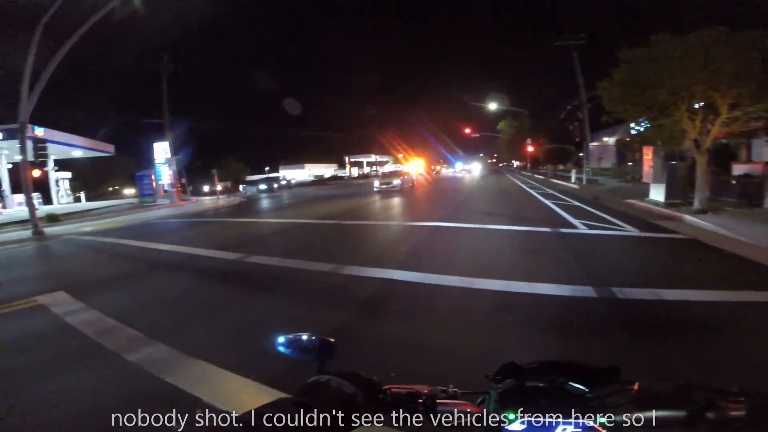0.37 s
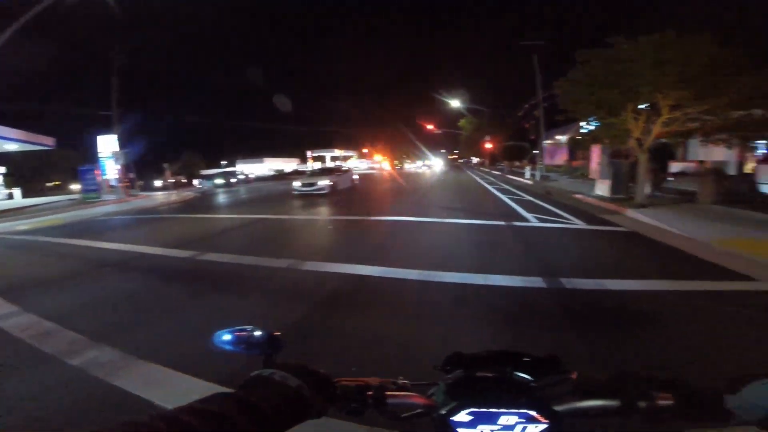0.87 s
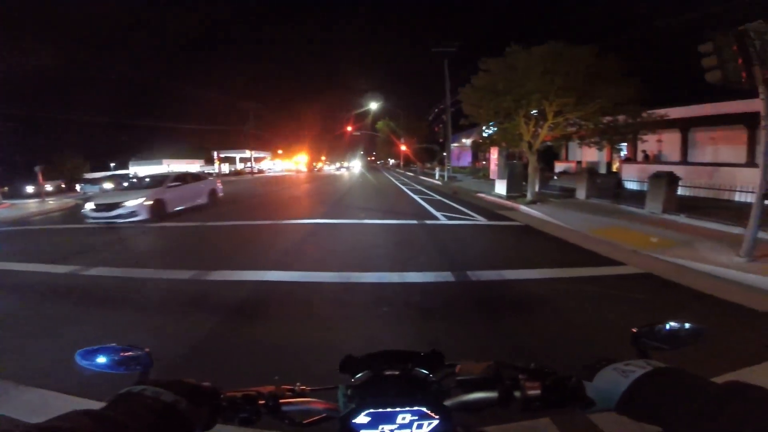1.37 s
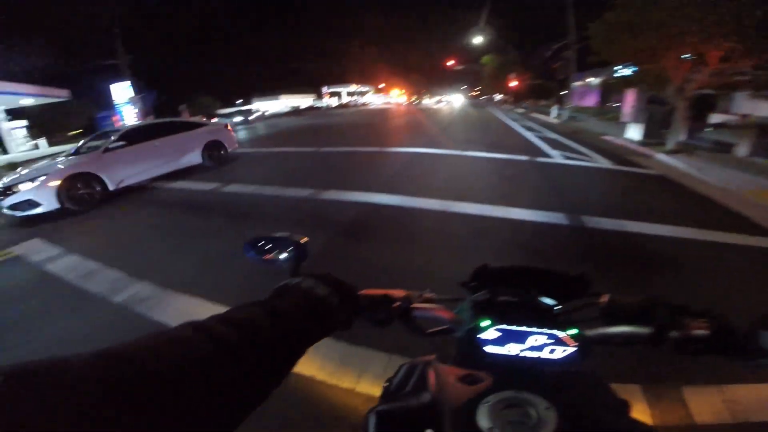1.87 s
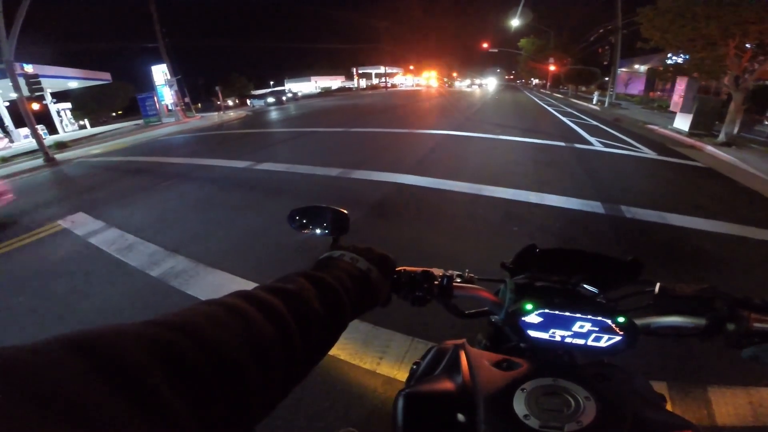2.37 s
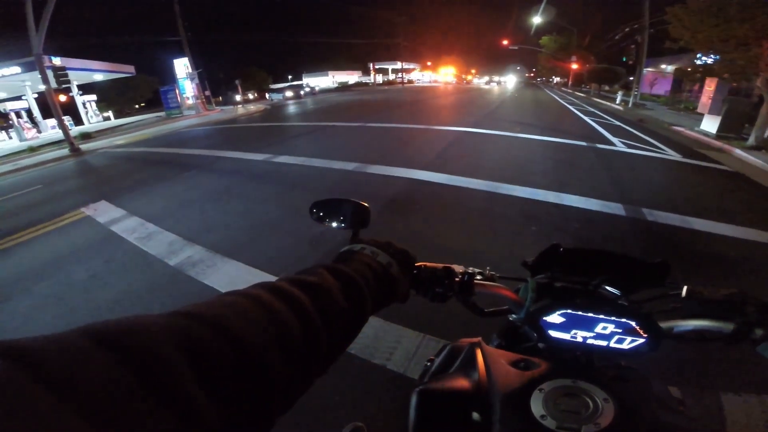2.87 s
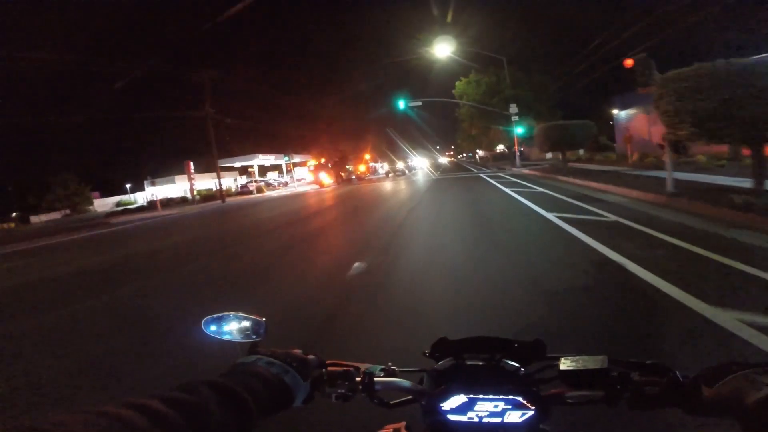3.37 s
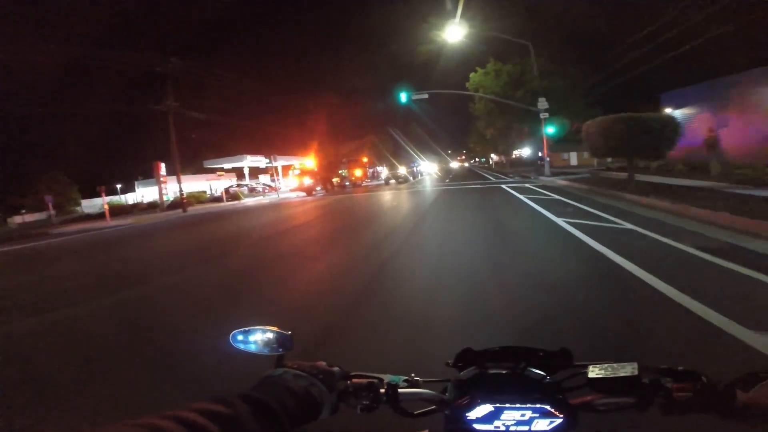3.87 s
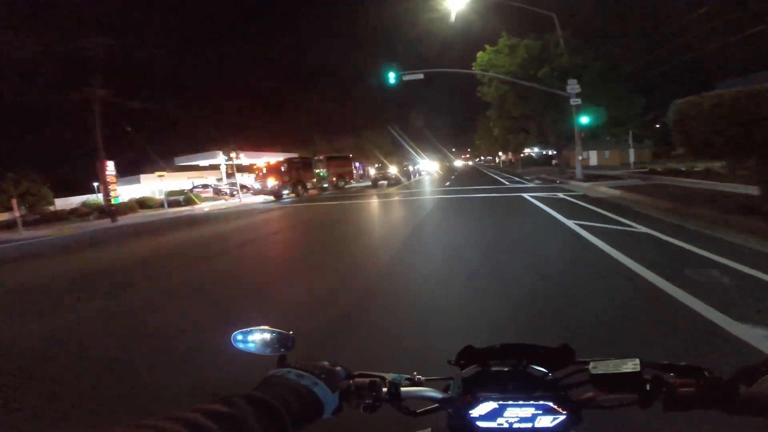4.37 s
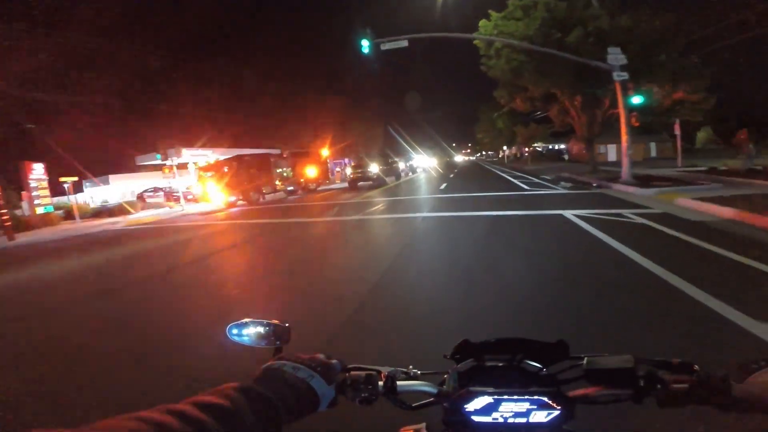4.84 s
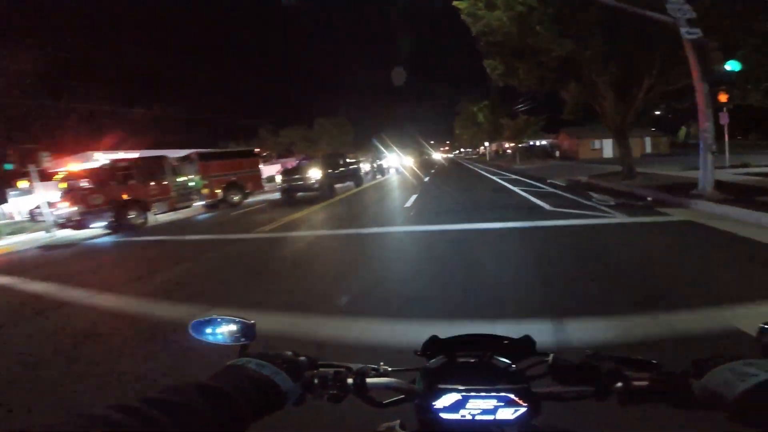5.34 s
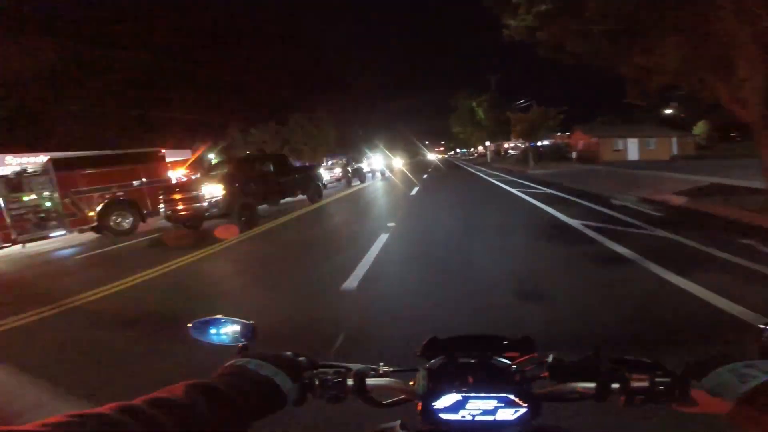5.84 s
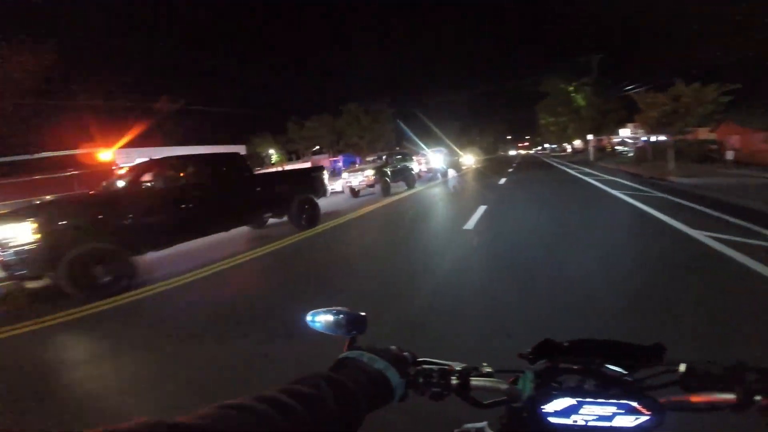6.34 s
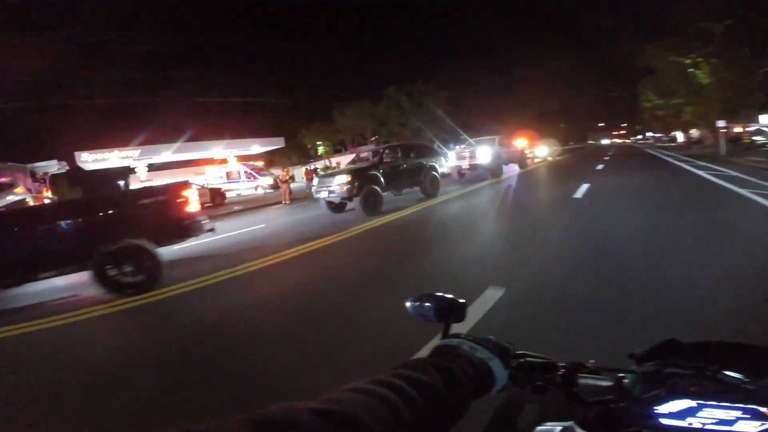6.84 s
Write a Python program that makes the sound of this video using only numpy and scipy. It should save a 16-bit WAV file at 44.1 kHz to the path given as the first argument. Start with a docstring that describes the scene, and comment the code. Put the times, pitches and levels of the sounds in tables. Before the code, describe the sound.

One microphone close to the rider, nearly everything on the right, the left only faint buzz and hiss. First a lumpy motorcycle idle with low electrical hum, crisp clicks, tiny ticks, rustling and a car rolling past. A momentary fade to nothing, then the engine pulls steadily, louder and rising slightly in pitch, with low wind gusts, mechanical rattle and a rough roar.

```python
"""Night street from a motorcycle saddle, one microphone wired to the right channel. An uneven-firing twin (sine
orders plus gated noise) idles under a strong low hum while a car rolls by (noise swelling as 1/distance), very
high ticks sound and gear clicks. After a short fade the bike is under way: wind noise, road roar, rattle and a low
drone of sines under the exhaust. The left channel holds only crosstalk, buzz and amplifier hiss."""
import sys
import numpy as np
from scipy import signal
from scipy.fft import rfft, irfft
from scipy.io import wavfile
from scipy.ndimage import uniform_filter1d

SR = 44100
rng = np.random.default_rng(int(sys.argv[2]) if len(sys.argv) > 2 else 0)


def pcm_store(signal):
    """Save signal as 16-bit PCM."""
    levels = np.round(np.clip(np.atleast_2d(signal), -1, 1) * 32767)
    wavfile.write(sys.argv[1], SR, levels.astype(np.int16).T)


def invert_db(level):
    """Linear amplitude ratio for a level in decibels (20 dB per decade), elementwise."""
    return 10 ** (np.asarray(level, dtype=float) / 20)


N = 307443

# engine speed while riding: t/s, cycles per second/Hz
RIDE_SPEED = [(3.42, 26.05), (3.78, 26.42), (4.0, 26.75), (4.38, 27.12), (4.78, 27.5), (5.1, 27.58),
              (5.4, 27.7), (5.8, 27.78), (6.4, 27.78), (6.6, 27.83), (6.97, 27.83)]
# spectrum of car and road roar: f/Hz, density/dB per Hz
ROAR_COLOUR = [(250, -18.5), (450, 3), (700, 4), (950, 1), (1200, -9.5), (2000, -31)]
# fade between the two moments: out from, silent at, back by [s]
FADE_S = (3.352, 3.387, 3.427)


def curve(table):
    """Second column of a (t/s, value) table, joined by straight lines."""
    s, value = np.transpose(table)
    return np.interp(np.arange(N) / SR, s, value)


def shape(x, points, skirt_db=-20):
    """Causal minimum-phase filter through (f/Hz, gain/dB) points, made from the folded cepstrum."""
    size = 2 ** 15
    hz, db = np.transpose(points)
    log_bins = np.log(np.arange(size // 2 + 1) * SR / size + 1)
    gain_db = np.interp(log_bins, np.log(hz), db, db[0] + skirt_db, db[-1] + skirt_db)
    cepstrum = irfft(gain_db * np.log(10) / 20)
    cepstrum[1:size // 2] *= 2
    cepstrum[size // 2 + 1:] = 0
    impulse = irfft(np.exp(rfft(cepstrum)))[:size // 2]
    return signal.fftconvolve(x, impulse)[:N]


def noise(points):
    """Coloured noise, rms 1."""
    y = shape(rng.standard_normal(N), points)
    return y / y.std()


def walk(rate_hz):
    """Random levels held 1 / rate_hz and slewed twice; spread near 1."""
    k = int(SR / rate_hz)
    held = np.repeat(rng.standard_normal(N // k + 1), k)
    return 1.2 * uniform_filter1d(uniform_filter1d(held, k), k)[:N]


def swells(table, bed_db):
    """Gain of bell-shaped swells over a constant bed, added as powers."""
    t = np.arange(N) / SR
    power = invert_db(bed_db) ** 2
    for s, db, half_s in table:
        power = power + (invert_db(db) * np.exp(-((t - s) / half_s) ** 2)) ** 2
    return np.sqrt(power)


def twin(speed, note_db, gas_db, orders, gas, start, smear, scatter_db, depth, puff_s):
    """Exhaust note on the orders of the engine cycle; each of the two firings also lets out a puff of noise."""
    # narrow pipe resonances lift the orders that climb into them: f/Hz, width/Hz, lift/dB
    pipe = [(129, 4, 4), (284, 20, 4), (444, 12, 6), (526, 14, 14)]
    second_firing = 3 / 8  # share of the cycle: firings 270 then 450 crank degrees apart
    second_puff_db, firing_share, waver_db = -2, 0.6, 1.1  # share: how far the note follows firing size
    hz = curve(speed)
    cycles = start + np.cumsum(hz) / SR
    note = 0
    for multiple, db in orders:
        # orders line up at the two firings; the pipe delays the higher ones and so smears each blow
        lag = np.angle(0.7 + np.exp(2j * np.pi * multiple * second_firing)) + smear * multiple ** 2
        lift_db = sum(top_db * np.exp(-((multiple * hz - at_hz) / width_hz) ** 2)
                      for at_hz, width_hz, top_db in pipe)
        level = invert_db(db + lift_db + waver_db * walk(6))
        note = note - level * np.sqrt(2) * np.cos(2 * np.pi * multiple * cycles - lag)

    due = (np.arange(int(cycles[-1]))[:, None] + np.array([0, second_firing])).ravel()
    later = np.arange(len(due)) % 2
    size = invert_db(scatter_db * rng.standard_normal(len(due)) + second_puff_db * later)
    pulses = np.bincount(np.interp(due, cycles, np.arange(N)).astype(int), size, N)
    decay = np.exp(-1 / (puff_s * SR))
    puffs = signal.lfilter([1], [1, -decay], uniform_filter1d(pulses, size=60))
    gate = 1 - depth + depth * puffs / np.sqrt(np.mean(puffs ** 2))

    strength = np.interp(cycles, due, size) ** firing_share
    note = invert_db(note_db) * note * strength / np.sqrt(np.mean(strength ** 2))
    return note + invert_db(gas_db + waver_db * walk(14)) * gate * noise(gas)


def idling():
    """The twin ticking over near 11 cycles a second, firings uneven in size."""
    # engine speed: t/s, cycles per second/Hz
    speed = [(0, 11.23), (.5, 11.28), (1.15, 10.96), (1.45, 11.25), (2.16, 10.72), (2.8, 11.2),
             (3.36, 11.02)]
    # strength of the firings: t/s, level/dB
    note_db = [(0, -1), (.5, -0.5), (1.2, -2.5), (1.6, -1.5), (1.9, -0.5), (2.5, 0.5), (3.36, -1)]
    # exhaust note; the firing intervals favour orders 3, 5, 6, 8, 11: multiple of the cycle, level/dB
    orders = [(2, -53), (3, -44), (4, -53), (5, -41), (6, -47), (7, -53), (8, -41), (9, -51), (10, -49),
              (11, -42), (12, -53), (13, -48), (14, -50), (15, -56), (16, -49), (17, -58), (18, -56),
              (19, -52), (20, -58), (21, -51), (22, -53), (23, -59), (24, -60), (27, -56), (29, -62)]
    # gas noise: f/Hz, density/dB per Hz
    gas = [(25, -26), (45, -9), (85, -6), (130, -3.5), (200, -7), (300, -6.5), (420, -13.5), (900, -27),
           (1500, -25.5), (2500, -27), (4500, -36), (7000, -40.5), (10000, -46), (12500, -51.5),
           (15300, -62)]
    # start: share of the cycle; smear: radians per order squared
    return twin(speed, curve(note_db), -36, orders, gas,
                start=0.79, smear=0.013, scatter_db=1.5, depth=0.15, puff_s=0.008)


def hum(multiple=1):
    """Steady low sine, rms 1."""
    hum_hz = 60.05
    return np.sqrt(2) * np.sin(2 * np.pi * multiple * hum_hz * np.arange(N) / SR)


def strong_hum():
    """The hum at its slowly changing level, with a faint tone not quite an octave above."""
    # t/s, level/dB
    level_db = [(0, -18), (1.7, -19), (2, -21.5), (3.4, -22), (3.6, -26), (4.4, -22), (5.4, -21.5),
                (6, -25), (6.4, -29), (6.97, -32)]
    return invert_db(curve(level_db)) * (hum() + invert_db(-29) * hum(multiple=1.9))


def whine(after):
    """Thin whine: resonators narrow white noise to bands, each wavering in level."""
    # f/Hz, width/Hz, level waiting/dB, level riding/dB
    bands = [(5034, 110, -66, -63), (10060, 110, -77, -71)]
    out = 0
    for hz, width_hz, waiting_db, riding_db in bands:
        band = signal.lfilter(*signal.iirpeak(hz, hz / width_hz, SR), rng.standard_normal(N))
        db = np.where(after, riding_db, waiting_db)
        out = out + invert_db(db + 2.1 * walk(3.9)) * band / band.std()
    return out


def dead_channel(live):
    """Unwired channel: dull low-passed crosstalk, buzz on overtones of the hum, amplifier hiss."""
    # f/Hz, density/dB per Hz
    hiss = [(20, -92), (60, -88), (150, -88), (300, -95), (1000, -101), (3000, -104), (8000, -108),
            (15000, -110), (15300, -140)]
    # multiple of the hum, level/dB
    buzz = [(2, -72), (3, -73), (4, -77), (5, -83)]
    crosstalk_db, crosstalk_hz, hiss_db = -32.8, 140, -62.5
    leak = invert_db(crosstalk_db) * signal.filtfilt(*signal.butter(1, crosstalk_hz, fs=SR), live)
    tones = sum(invert_db(db) * hum(multiple) for multiple, db in buzz)
    return leak + invert_db(hiss_db) * noise(hiss) + tones


def traffic():
    """A car crosses over distant traffic: roar, tyre hiss and a singing band rise and fall as 1/distance."""
    # tyre hiss: f/Hz, density/dB per Hz
    tyre_colour = [(700, -18.5), (1250, 2), (1800, 1), (2500, -6), (3100, -11), (3500, -22), (4200, -16),
                   (8000, -25), (14000, -46)]
    # singing band of the car: f/Hz, density/dB per Hz
    whine_colour = [(3050, -30), (3330, -2), (3500, 0), (3700, -4), (4000, -30)]
    nearest_s, speed_m_s, nearest_m = 1.72, 9, 3.8
    roar_late_s = 0.38  # the exhaust is loudest once the tail has passed
    car_roar_db, car_tyres_db, far_roar_db, far_tyres_db = -41, -45, -48, -54
    whine_s, whine_db = 1.5, -61

    def near(s):
        """Gain of a source passing at time s, 1 at its nearest."""
        return nearest_m / np.hypot(nearest_m, speed_m_s * (np.arange(N) / SR - s))

    roar = np.hypot(invert_db(far_roar_db), invert_db(car_roar_db) * near(nearest_s + roar_late_s))
    tyres = np.hypot(invert_db(far_tyres_db), invert_db(car_tyres_db) * near(nearest_s))
    out = roar * invert_db(1.0 * walk(18)) * noise(ROAR_COLOUR)
    out = out + tyres * invert_db(1.5 * walk(6.63)) * noise(tyre_colour)
    return out + invert_db(whine_db + 1.7 * walk(9.7)) * near(whine_s) * noise(whine_colour)


def rustle():
    """Soft treble rustles: flickering noise swelling over a faint bed."""
    # peak t/s, peak level/dB, half length/s
    rustles = [(.05, -51, 0.14), (.3, -51, 0.26), (.94, -60, .15), (1.74, -54, 0.21), (2.45, -50, 0.19),
               (3.07, -70, .04)]
    # f/Hz, density/dB per Hz
    colour = [(2000, -2), (4500, -9), (7000, -11.5), (10000, -14.5), (12500, -20), (15000, -43)]
    return swells(rustles, bed_db=-80) * invert_db(2.4 * walk(24.4)) * noise(colour)


def ticks():
    """Each very high tick is a short stutter of three decaying sines."""
    # t/s, level/dB
    tick_table = [(0.0737, -37), (0.3247, -41), (0.4579, -38), (0.5746, -39), (0.7248, -39), (0.8455, -40),
                  (1.0091, -45), (1.2984, -44), (1.4391, -48), (1.5748, -44), (1.7075, -41), (1.8262, -37),
                  (2.1061, -39), (2.2553, -52), (2.372, -41), (2.7252, -42), (2.9422, -48)]
    out, t = np.zeros(N), np.arange(int(0.004 * SR)) / SR
    for (s, db), stutter in zip(tick_table, rng.random((len(tick_table), 3, 3))):
        for k, (late, size, pitch) in enumerate(stutter):
            follows = k > 0  # the first is on time and loudest
            i = int((s + follows * late * 0.009) * SR)
            swing = np.sin(2 * np.pi * (12500 + 2600 * pitch) * t) * np.exp(-t / 0.0004)
            out[i:i + len(t)] += invert_db(db - 5 * follows * size) * swing
    return out


def clicks():
    """Hard gear clicks close by: a sharp knock in a band-passed noise burst that dies within milliseconds."""
    # t/s, peak level/dB, centre f/Hz, length/ms
    click_table = [(.165, -34, 6500, .2), (.303, -32, 4470, .4), (.921, -42, 9000, .15),
                   (.9336, -25.5, 5600, .12), (.961, -40, 6500, .6), (.966, -41, 6500, .5),
                   (1.751, -36, 7500, .25), (1.946, -39, 9000, .25), (1.994, -35, 5500, .25),
                   (2.064, -36, 9000, .2), (2.111, -37, 6000, .2), (2.2565, -41, 10000, .2),
                   (2.2651, -25.5, 7500, .2), (2.667, -31, 5000, .2), (3.0608, -40, 7000, .15),
                   (3.0652, -28, 7500, .15), (3.0826, -33, 7500, .12), (3.2506, -23.5, 6700, .45),
                   (3.2522, -33, 5800, 1.4)]
    out, t_ms = np.zeros(N), np.arange(int(0.012 * SR)) / SR * 1000
    for s, db, hz, ms in click_table:
        burst = rng.standard_normal(len(t_ms))
        burst[int(ms * SR / 1000)] += 4  # the knock
        burst *= t_ms * np.exp(-t_ms / ms) + 0.04 * ms * np.exp(-t_ms / 4)
        band = signal.butter(3, [0.5 * hz, 1.45 * hz], "band", fs=SR)
        burst = signal.lfilter(*band, burst)
        i = int(s * SR)
        out[i:i + len(t_ms)] += invert_db(db) * burst / abs(burst).max()
    return out


def waiting():
    """First moment: idle, traffic, rustle, ticks and clicks."""
    return idling() + traffic() + rustle() + ticks() + clicks()


def under_load():
    """The twin pulling, 26 to 28 cycles a second, with louder gas noise."""
    # exhaust note: multiple of the cycle, level/dB
    orders = [(1, -42), (2, -46), (3, -33), (4, -37), (5, -31), (6, -34.5), (7, -50), (8, -41), (9, -41),
              (10, -39.5), (11, -40), (12, -45), (13, -47), (14, -53), (15, -52), (16, -49), (17, -46.5),
              (18, -51), (19, -57), (20, -61), (21, -55), (22, -54), (23, -50), (24, -53), (26, -55),
              (28, -51.5), (30, -52), (34, -53), (36, -59), (46, -60), (55, -63)]
    # gas noise: f/Hz, density/dB per Hz
    gas = [(40, -18), (100, -6), (250, -3), (400, -9), (600, -9.5), (800, -15), (1200, -16.5), (2500, -22),
           (4500, -30), (6500, -33.5), (9500, -40.5), (11500, -45.5), (12800, -58), (13600, -67)]
    return twin(RIDE_SPEED, 1.8, -29, orders, gas,
                start=0.72, smear=0.04, scatter_db=2, depth=0.16, puff_s=0.005)


def wind():
    """Air on the microphone: fluttering low noise with gusts, plus a steady breeze."""
    # peak t/s, peak level/dB, half length/s
    gusts = [(3.44, -26.5, .04), (3.9, -28, 0.1), (4.43, -26, .06), (5.3, -20, 0.053), (5.55, -22.5, 0.13),
             (5.85, -32, 0.053), (6.05, -18.5, 0.053), (6.22, -32, .06), (6.92, -31, .08)]
    # gusts and their bed: f/Hz, density/dB per Hz
    gust_colour = [(7, -30), (11, -1), (16, 0), (25, -6), (40, -7), (70, -12), (150, -20), (400, -36),
                   (2000, -70), (8000, -110)]
    # steady stream of air: f/Hz, density/dB per Hz
    breeze_colour = [(10, -19), (20, -5), (32, -2.5), (50, -3.5), (100, -9), (300, -27.5), (2000, -67)]
    gusting = swells(gusts, bed_db=-54) * invert_db(2 * walk(10)) * noise(gust_colour)
    return gusting + invert_db(-28.5 + 0.59 * walk(13)) * noise(breeze_colour)


def thump():
    """A buffet of air knocks the microphone: a couple of low swings."""
    peak_s, level_db, hz, half_s = 3.434, -14, 68, 0.014
    t = np.arange(N) / SR - peak_s
    return -invert_db(level_db) * np.exp(-(t / half_s) ** 2) * np.cos(2 * np.pi * hz * t)


def rattle():
    """Loose parts and valve gear: filtered random impulses of unequal size and either sign."""
    # f/Hz, density/dB per Hz
    colour = [(400, -33), (700, 2.5), (1200, -1), (1800, -1), (2500, -10.5), (5000, -22), (9000, -25.5)]
    knocks_per_s, spread_db, level_db = 300, 18, -43
    where, way, size = rng.random((3, N))
    knocks = (where < knocks_per_s / SR) * np.sign(way - 0.5) * invert_db(spread_db * size)
    y = shape(knocks, colour)
    return invert_db(level_db + 0.98 * walk(12)) * y / y.std()


def road_roar():
    """Intake and road roar: noise that swells once an engine cycle."""
    # t/s, level/dB
    level_db = [(3.4, -60), (4, -52), (4.4, -45), (4.7, -38.5), (5.0, -39.5), (5.3, -37.5), (5.7, -39),
                (5.9, -47), (6.1, -38), (6.5, -38), (6.97, -36)]
    throb_db = 3.5 * np.cos(2 * np.pi * np.cumsum(curve(RIDE_SPEED)) / SR)
    return invert_db(curve(level_db) + throb_db + 0.82 * walk(11)) * noise(ROAR_COLOUR)


def drone():
    """Low drone just under the third order, three harmonics, rising with engine speed."""
    # t/s, level/dB
    level_db = [(3.4, -27.5), (3.9, -28), (4.5, -30.5), (5.1, -27.5), (6.4, -28), (6.97, -22)]
    order, second_db, third_db = 2.915, -12.5, -15.5
    turn = 2 * np.pi * order * np.cumsum(curve(RIDE_SPEED)) / SR
    tone = np.sin(turn) + invert_db(second_db) * np.sin(2 * turn) + invert_db(third_db) * np.sin(3 * turn)
    return invert_db(curve(level_db) + 1.2 * walk(8.1)) * np.sqrt(2) * tone


def riding():
    """Second moment: twin under load, wind, rattle, roar and drone, low-passed so the top treble is gone."""
    out = under_load() + wind() + thump() + rattle() + road_roar() + drone()
    top_hz = 12900
    return signal.sosfilt(signal.ellip(8, 0.2, 70, top_hz, fs=SR, output="sos"), out)


def scene():
    """Both moments as the one microphone hears them; source levels refer to the mean of both channels."""
    # dips and bumps of the helmet around the microphone: f/Hz, gain/dB
    helmet = [(1000, -1), (1450, 2), (1620, -5), (1800, 3), (2050, -3.5), (2300, 1), (2500, 1),
              (2700, -1.5), (2950, -3), (3300, -2), (3900, 0), (4400, -1), (5500, 0.5), (7000, -2)]
    after = np.arange(N) > FADE_S[1] * SR
    moments = np.where(after, riding(), waiting())
    heard = shape(moments, helmet, skirt_db=0.5) + whine(after) + strong_hum()
    return np.array([0 * heard, 2 * heard])  # right alone, doubled to keep the mean


def band_limit(x):
    """A steep low-pass at the top of the band."""
    return signal.sosfilt(signal.butter(12, 15730, fs=SR, output="sos"), x)


def record(dry):
    """Adds the dead channel; both channels dip briefly to silence between the two moments."""
    fade = np.interp(np.arange(N) / SR, FADE_S, [1, 0, 1]) ** 2
    mix = fade * np.array([dead_channel(dry[1]), dry[1]])
    return band_limit(mix)


dry = scene()
out = record(dry)
pcm_store(out)
```